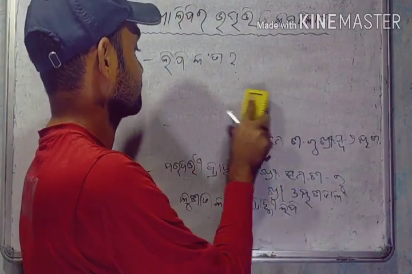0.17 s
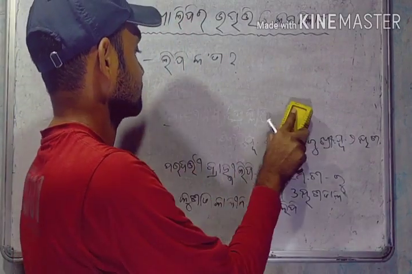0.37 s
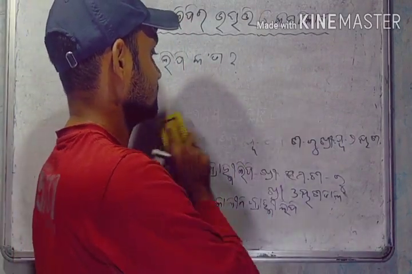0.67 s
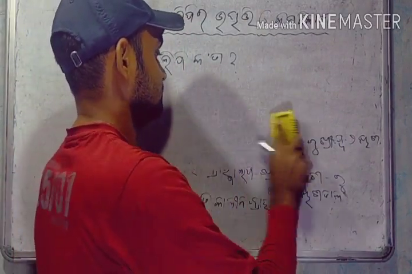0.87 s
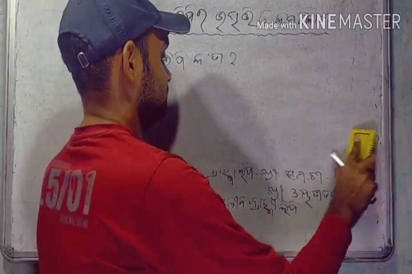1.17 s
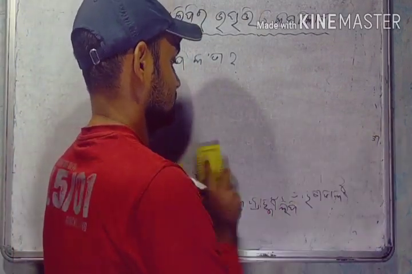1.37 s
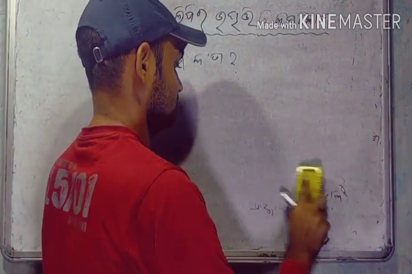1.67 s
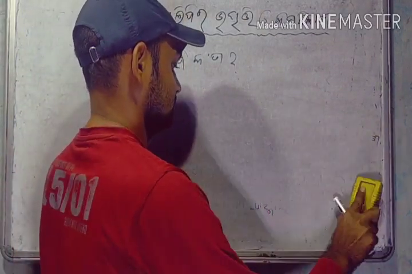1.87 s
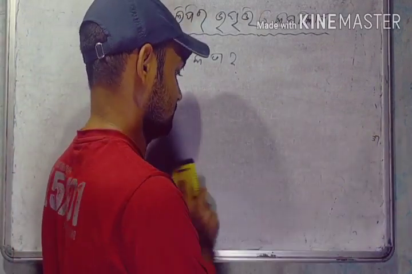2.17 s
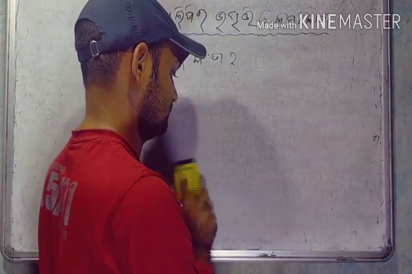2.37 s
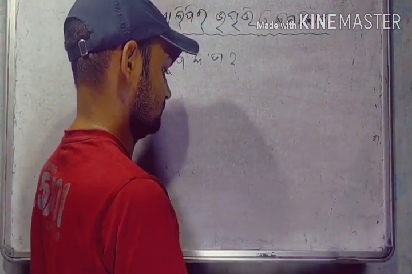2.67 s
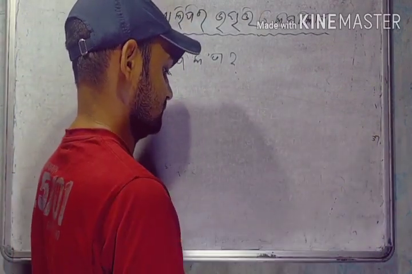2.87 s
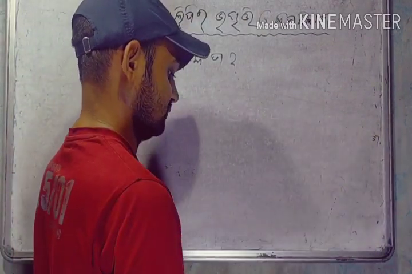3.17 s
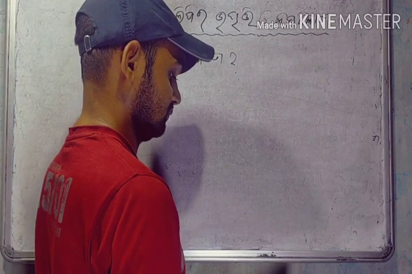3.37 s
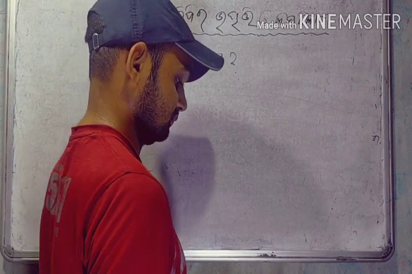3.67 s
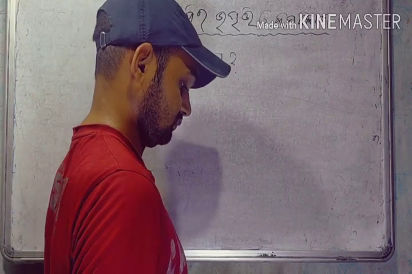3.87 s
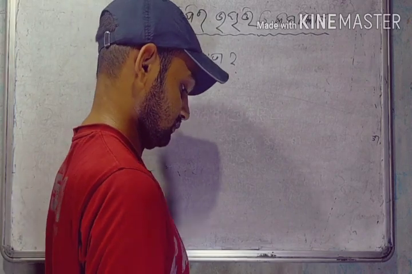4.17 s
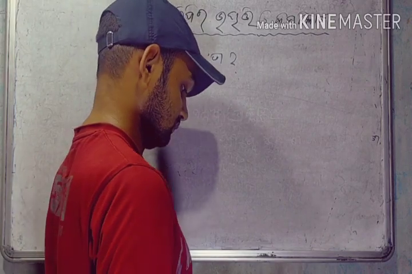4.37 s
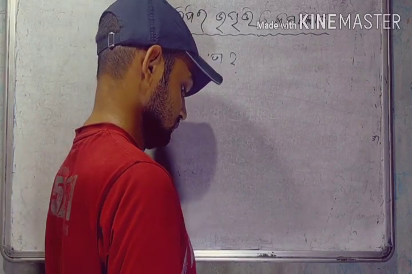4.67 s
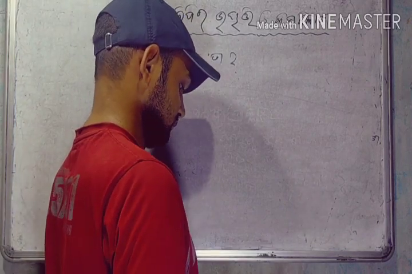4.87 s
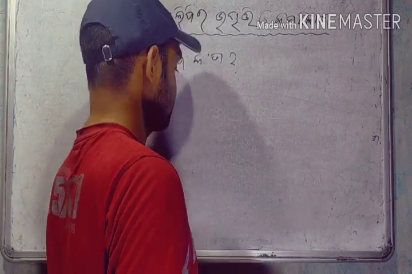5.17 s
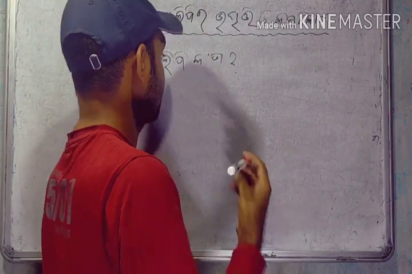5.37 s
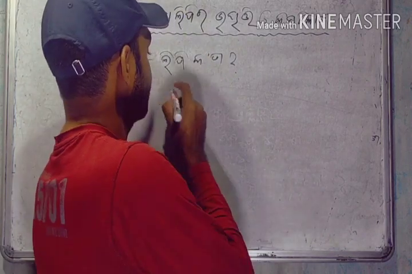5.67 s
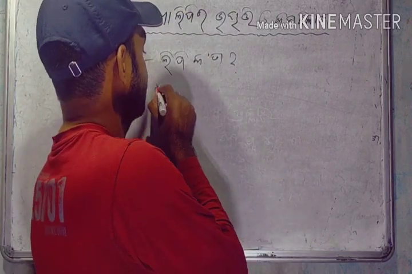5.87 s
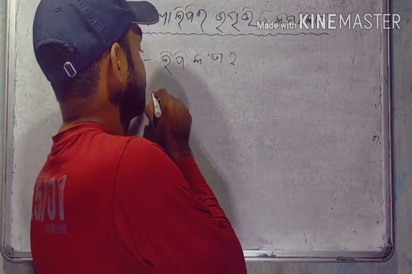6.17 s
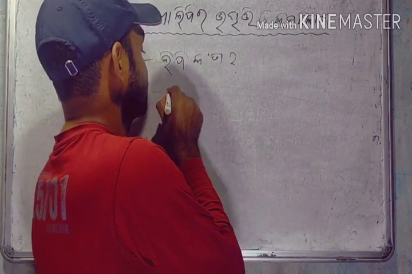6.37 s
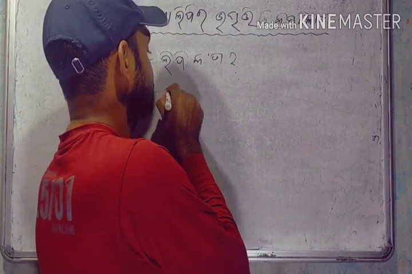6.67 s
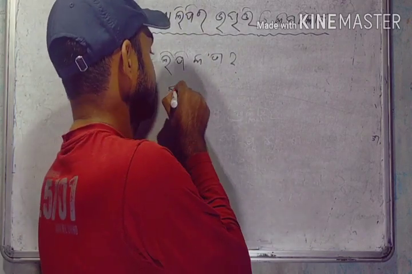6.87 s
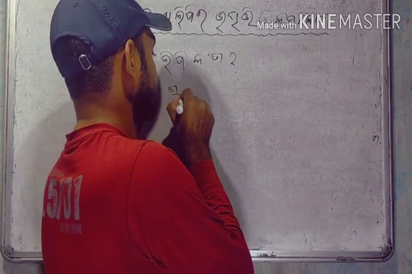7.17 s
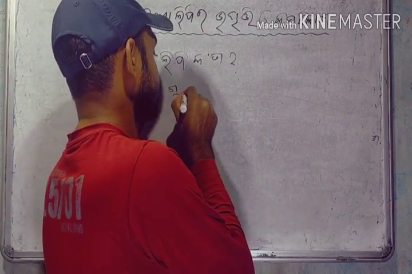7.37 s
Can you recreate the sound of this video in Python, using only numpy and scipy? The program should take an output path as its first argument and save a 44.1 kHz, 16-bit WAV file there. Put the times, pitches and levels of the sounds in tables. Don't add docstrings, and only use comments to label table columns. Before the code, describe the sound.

Over a low wavering fan hum, a felt duster sweeps a whiteboard in quick hissing strokes, then faint knocks and light marker ticks follow.

```python
import sys
import numpy as np
from scipy import signal
from scipy.fft import rfft, irfft
from scipy.io import wavfile
from scipy.ndimage import uniform_filter1d

SR = 44100
rng = np.random.default_rng(int(sys.argv[2]) if len(sys.argv) > 2 else 0)


def transcribe(signal):
    frames = np.atleast_2d(signal).T
    limited = np.clip(frames, -1, 1)
    pcm = np.round(limited * 32767).astype(np.int16)
    wavfile.write(sys.argv[1], SR, pcm)


def gain_from_db(level_db):
    decades = np.asarray(level_db, float) / 20
    return 10 ** decades


N = 331509

# [t/s, f/Hz]
BLADE_RATE = [(0, 70.95), (3.5, 70.97), (3.8, 70.8), (5.7, 70.8), (6.1, 71.4), (6.6, 71.6), (7.52, 71.8)]
# [multiple of the blade rate, level/dB]
FAINT_TONES = [(1, -64), (5, -55.5), (6, -52.5)]
# [t/s, length/s, change of tone 2/dB, change of tone 4/dB]
TONE_FADES = [(0.0, 0.52, -13, -4.5), (0.667, 0.41, -0.5, -13.5), (1.128, .22, -11, -4.5),
              (1.624, 0.17, -8, -3), (2.087, 0.17, -12.5, 0.5), (2.37, 0.15, -1, -6),
              (3.017, 0.21, -14.5, -9.5), (3.22, 0.16, 0.5, -7), (3.665, 0.43, -8, -6.5),
              (4.385, 0.4, -0.5, -8.5), (4.865, 0.57, -2.5, -9.5), (5.437, 0.3, -8.5, -11),
              (5.61, 0.2, 3.5, -14), (6.053, 0.23, -5, -2), (6.5, 0.32, -7.5, -11.5),
              (6.878, 0.37, -12, -6.5), (7.177, 0.34, -12, -7), (7.38, 0.19, 1.5, -3),
              (7.52, 0.17, -19, -2)]
# [t/s, length/s, change/dB]
THIRD_TONE_FADES = [(.5, 0.39, -16), (.95, 0.33, -1.5), (1.57, 0.14, -16), (2.1, 0.25, -19), (2.8, .5, -24),
                    (3.4, 0.73, -7), (3.895, 0.22, -23), (4.407, 0.14, -10), (5.0, 0.39, -2),
                    (5.9, 0.53, -10), (6.892, 0.13, -12)]
# [t/s, rise/dB]
GUSTS = [(.16, 7), (.8, 13), (1.02, 9), (1.28, 16), (1.6, 18), (2.12, 15), (2.56, 10), (2.88, 12), (3.3, 6),
         (3.52, 13), (3.84, 11), (4.16, 12), (4.66, 16.5), (5.12, 11), (5.3, 11), (6.58, 14.5), (6.74, 8),
         (7.04, 11.5), (7.36, 7)]
# [f/Hz, level per Hz/dB]
AIR_COLOUR = [(45, -50), (80, -38), (110, -7.5), (140, -4), (300, -4), (450, -6.5), (900, -11.5),
              (2000, -17), (3200, -24), (4200, -29.5), (6500, -42), (10000, -46.5), (12500, -49),
              (15500, -43)]
# [t/s, level/dB]
WASH_SWELL = [(0, -40), (.42, -41), (.75, -34.5), (1.13, -35.5), (1.5, -35), (2.65, -34), (3.0, -38),
              (7.52, -39)]
# [f/Hz, width/Hz, level/dB]
ROOM_MODES = [(130, 16, 8), (185, 12, 7), (212, 10, 4), (270, 36, 5), (325, 14, -3), (342, 16, 8),
              (366, 14, -4), (418, 18, 4), (447, 20, -6), (475, 20, 2), (492, 8, -3), (505, 20, 2),
              (540, 30, 3.5), (615, 25, 2), (680, 25, -3), (715, 35, 3), (790, 25, 2), (930, 35, -5),
              (975, 40, 3), (1020, 20, 3), (1150, 25, -4), (1195, 40, 2), (1290, 50, 2), (1400, 70, -2),
              (1690, 60, 3), (1790, 130, -3), (1890, 60, 3), (2000, 50, -3), (2385, 50, 2), (2430, 40, -4)]
# [start t/s, length/s, glide level/dB, push t/s, push level/dB]
STROKES = [
    (-.2, 0.59, -41.5, .26, -73),
    (0.428, 0.28, -32.5, 0.69, -46),
    (0.703, 0.43, -32, 0.77, -31.5),
    (1.148, 0.4, -30.5, 1.455, -36.5),
    (1.544, 0.35, -32, 1.601, -25.5),
    (1.926, 0.42, -29.5, 2.255, -37.5),
    (2.34, 0.31, -34.5, 2.455, -28),
]
# [t/s, length/s, change/dB]
PAD_HOP = (1.9, .035, -2)
# [f/Hz, level per Hz/dB]
FELT_COLOUR = [(200, -30), (500, 2.5), (1500, -9.5), (2800, -3.5), (3600, -5), (4600, 3), (5500, -0.5),
               (6800, -2.5), (9500, -5.5), (11500, -8), (13500, -3.5), (15600, 6)]
# [t/s, crack level/dB, crack f/Hz, body level/dB, body f/Hz]
KNOCKS = [(1.713, -24, 8000, -27.5, 4500), (1.7172, -24.5, 8200, -23, 1630), (1.731, -32, 9000, -29, 2500),
          (2.2535, -38, 6000, -24, 2900), (3.13, -45, 5000, -28, 2000), (3.136, -46, 5000, -23.5, 1500),
          (3.140, -53, 4500, -32, 3560), (3.146, -52, 4500, -31, 1800), (4.884, -49, 8500, -33, 2000),
          (5.667, -51, 12500, -60, 2000), (5.808, -54, 12000, -60, 1970), (5.812, -49, 11000, -60, 2000),
          (7.331, -62, 8000, -23, 620)]
# [t/s, length/s, level/dB]
BRUSHES = [(2.853, .15, -55), (3.25, 0.28, -56.5), (3.7, .7, -65.5), (4.12, 0.34, -64.5), (4.48, 0.12, -64),
           (4.64, .06, -62), (4.78, .1, -61), (4.89, .06, -67), (5.05, 0.11, -57), (5.22, .04, -67),
           (5.3, .06, -69), (5.68, .12, -63), (5.81, .05, -63), (5.878, .04, -69), (6.29, .06, -71),
           (6.62, .05, -68), (6.693, .07, -61), (6.83, .07, -64), (6.96, .09, -68), (7.172, .07, -60),
           (7.357, .09, -57)]
# [f/Hz, width/Hz, level/dB]
MIC_RINGING = [(4100, 1120, -7.5), (8340, 2020, 10.5), (15400, 960, 2.5)]
# [f/Hz, width/Hz, level/dB]
TREBLE_DIP = [(7885, 110, -9)]
# [t/s, low f/Hz, high f/Hz]
TREBLE_PARTINGS = [(1.26, 6800, 9500), (2.236, 11500, 14000), (2.472, 6900, 8500), (3.05, 6000, 13000),
                   (3.237, 6000, 12000), (4.376, 7000, 10000), (6.095, 7000, 10000), (6.327, 7000, 10000),
                   (6.628, 8000, 10000)]


def evened(x):
    return x / np.sqrt(np.mean(x ** 2) + 1e-20)


def read(points, hz):
    f, value = np.transpose(points)
    return np.interp(np.log(hz + 1), np.log(f + 1), value)


def bumps(modes, hz):
    return sum(db / (1 + (2 * (hz - f) / width) ** 2) for f, width, db in modes)


def bell(t, s, length):
    return .5 ** ((2 * (t - s) / length) ** 2)


def drift(length, shape=N):
    length = max(int(length), 1)
    once = uniform_filter1d(rng.standard_normal(shape), length)
    return evened(uniform_filter1d(once, length))


def patches(hz, t, bins, frames):
    field = rng.standard_normal((len(t), len(hz))).T
    across_hz = uniform_filter1d(field, max(int(bins), 1), 0)
    return evened(uniform_filter1d(across_hz, max(int(frames), 1), 1))


def shaped(x, field_db, size):
    overlap = size * 3 // 4
    hz, t, z = signal.stft(x, SR, nperseg=size, noverlap=overlap)
    return signal.istft(z * gain_from_db(field_db(hz, t)), SR, nperseg=size, noverlap=overlap)[1][:N]


def fibres(per_s, spread_db):
    size = gain_from_db(spread_db * np.minimum(rng.exponential(1, N), 5))
    direction = rng.choice([-1., 1.], N)
    return evened(size * direction * (rng.random(N) < per_s / SR))


def tone(hz, db, waver_db, wander):
    phase = 2 * np.pi * np.cumsum(hz) / SR + wander * drift(1830)
    return np.sqrt(2) * gain_from_db(db + waver_db * drift(1550)) * np.sin(phase)


def fan():
    second_db, third_db, fourth_db = -27, -37.5, -31.5
    boom_hz, boom_db, gust_s = 127.4, -46, .2
    motor_hz, motor_db = 99.3, -55
    t = np.arange(0, N / SR, .005)
    second, fourth = sum(np.outer(db, bell(t, s, length)) for s, length, *db in TONE_FADES)
    third = sum(db * bell(t, s, length) for s, length, db in THIRD_TONE_FADES)
    boom = sum(db * bell(t, s, gust_s) for s, db in GUSTS)

    now = np.arange(N) / SR
    curves = (second_db + second, third_db + third, fourth_db + fourth)
    levels = [np.interp(now, t, curve) for curve in curves]
    hz = np.interp(now, *np.transpose(BLADE_RATE))
    out = sum(tone(k * hz, db, 2.4, .3) for k, db in zip(range(2, 5), levels))
    out += sum(tone(round(k) * hz, db, 5.7, .6) for k, db in FAINT_TONES)
    out += tone(np.full(N, motor_hz), motor_db, 2.2, 0.15)
    return out + tone(np.full(N, boom_hz), np.interp(now, t, boom_db + boom), 0.94, 1.0)


def air():
    level_db = -30.5

    def field_db(hz, t):
        swell = np.interp(t, *np.transpose(WASH_SWELL))
        reach = read([(100, 0.96), (1500, 0.57), (5000, 0.85)], hz)
        swelling = np.outer(reach, swell - swell.mean())
        return read(AIR_COLOUR, hz)[:, None] + swelling + 0.82 * patches(hz, t, 16, 8)

    wash = shaped(rng.standard_normal(N), field_db, size=2048)
    room = gain_from_db(bumps(ROOM_MODES, np.fft.rfftfreq(N, 1 / SR)))
    return gain_from_db(level_db) * evened(irfft(rfft(wash) * room, N))


def arm(t):
    lifted_db, ease_s, brake_s, ease_power = -80, 0.18, 0.13, 0.7
    push_s, early_rise_s = 0.075, 0.067
    press_s, press_lead_s = 0.095, 0.015
    lean_db_per_s = 9.5
    hiss, press, late, outward = np.full(len(t), gain_from_db(lifted_db)), 0, 0, 0
    for start, length, glide_db, push_at, push_db in STROKES:
        moving = np.clip(np.minimum((t - start) / ease_s, (start + length - t) / brake_s), 0, 1)
        speed = np.sin(np.pi / 2 * moving) ** ease_power
        is_late = push_at > start + length / 2
        width_s = np.where((t > push_at) | is_late, push_s, early_rise_s)
        glide = speed * gain_from_db(glide_db - lean_db_per_s * abs(t - push_at))
        push = np.sqrt(speed) * gain_from_db(push_db) * bell(t, push_at, width_s)
        hiss = hiss + glide + push

        press_at = push_at - press_lead_s * (not is_late)
        weight = bell(t, press_at, press_s) / (1 + gain_from_db(glide_db - push_db))
        press = press + weight
        late = late + is_late * weight
        outward = outward + is_late * moving
    hop_s, hop_length_s, hop_db = PAD_HOP
    return 20 * np.log10(hiss) + hop_db * bell(t, hop_s, hop_length_s), press, late, outward


def duster():
    usual_db = -29

    def field_db(hz, t):
        hiss_db, push, late, outward = arm(t)
        quieter = usual_db - hiss_db
        rasp = 0 + 2.4 * push + 0.079 * quieter
        scrape = -10 + 11.6 * push + 0.23 * quieter
        board = -2.1 + 0.9 * push + 0.21 * quieter
        to_rasp = np.interp(hz, [6000, 7450, 9000, 11300], [0, 1, 1, 0])[:, None]
        to_scrape = np.interp(hz, [3630, 4500, 6000, 7950], [0, 1, 1, 0])[:, None]
        to_board = np.interp(hz, [3700, 4400], [1, 0])[:, None]
        pressure = to_rasp * (rasp - 1.5) + to_scrape * (scrape + 1.8)
        pressure += to_board * (board + 4 * late + 5.0)

        whistle_hz = 6700 - 6 * quieter
        pressure += (-0.5 + 18 * late) / (1 + (2 * (hz[:, None] - whistle_hz) / 600) ** 2)
        pressure += np.maximum(to_scrape, to_board) * 2.5 * (outward - .5)
        gone = np.interp(t, [2.7, 2.8], [0, -60])
        grain = 1.5 * patches(hz, t, 3, 24) + .6 * drift(3, len(t))
        return read(FELT_COLOUR, hz)[:, None] + hiss_db + pressure + gone + grain + 2.5

    return shaped(fibres(14000, 1.8), field_db, size=256)


def knocks():
    ring_s = 0.033
    out, t = np.zeros(N + 8000), np.arange(8000) / SR
    ring = gain_from_db(-60 * t / ring_s)
    fade = ring + gain_from_db(-16 - 60 * t / .3)
    crack_start = np.minimum(t / .0005, 1)
    body_start = np.sin(np.pi / 2 * np.minimum(t / .0015, 1)) ** 2
    for s, crack_db, crack_hz, body_db, body_hz in KNOCKS:
        noise = rng.standard_normal(len(t))
        bright = signal.butter(1, [.6 * crack_hz, 1.4 * crack_hz], "band", fs=SR)
        dull = signal.butter(3, [.5 * body_hz, 1.25 * body_hz], "band", fs=SR)
        crack = gain_from_db(crack_db) * signal.lfilter(*bright, noise) * fade
        ringing = np.sin(2 * np.pi * body_hz * t) * ring ** 2
        thud = 2.5 * signal.lfilter(*dull, noise) * fade
        body = gain_from_db(body_db) * (ringing + thud)
        out[round(s * SR):][:len(t)] += crack * crack_start + body * body_start
    return out[:N]


def rustle():
    still_db = -72

    def field_db(hz, t):
        colour = read([(2000, -27), (6000, -4), (9000, -7.5), (12000, -11), (15500, 0.5)], hz)
        brushing = sum(gain_from_db(db) * bell(t, s, length) for s, length, db in BRUSHES)
        level_db = 20 * np.log10(gain_from_db(still_db) + brushing)
        return colour[:, None] + level_db + 3.1 * patches(hz, t, 22, 16) + 2.5

    return shaped(fibres(6000, 2.8), field_db, size=256)


def scene():
    return np.tile(fan() + air() + duster() + knocks() + rustle(), (2, 1))


def top_cut(x):
    return signal.sosfilt(signal.butter(12, 16780, fs=SR, output="sos"), x)


def record(dry):
    edge_hz = 15480
    hz = np.fft.rfftfreq(N, 1 / SR)
    edge = np.clip((edge_hz + 50 - hz) / 100, 0, 1) ** 2
    heard = irfft(rfft(dry) * gain_from_db(bumps(MIC_RINGING + TREBLE_DIP, hz)) * edge, N)
    apart = np.zeros(N)
    for s, low_hz, high_hz in TREBLE_PARTINGS:
        near = slice(round(s * SR) - 1024, round(s * SR) + 1024)
        band = signal.firwin(255, [low_hz, high_hz], pass_zero=False, fs=SR)
        treble = np.convolve(heard[0, near][::-1], band, "same")
        apart[near] = treble * .65 * np.hanning(2048) ** .5
    return top_cut(heard + np.outer([1, -1], apart))


dry = scene()
out = record(dry)
transcribe(out)
```